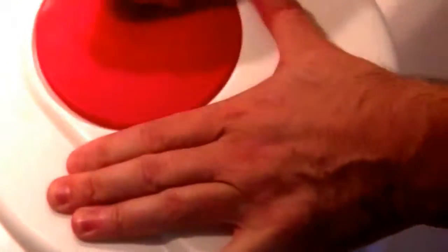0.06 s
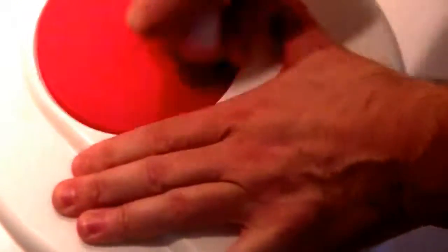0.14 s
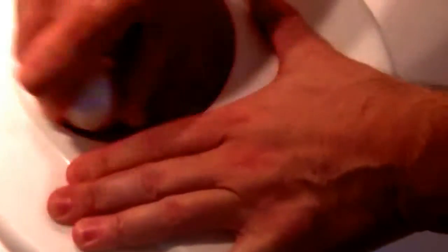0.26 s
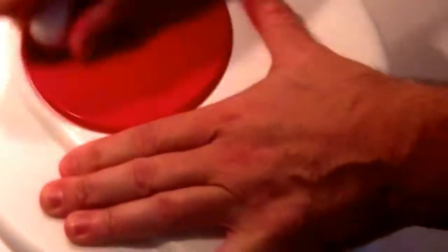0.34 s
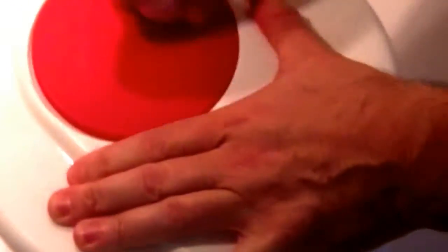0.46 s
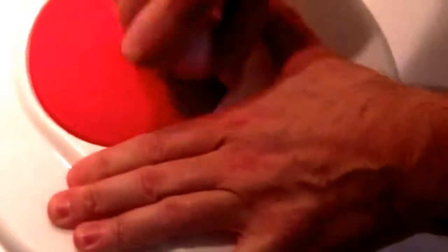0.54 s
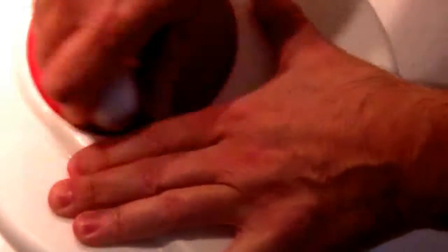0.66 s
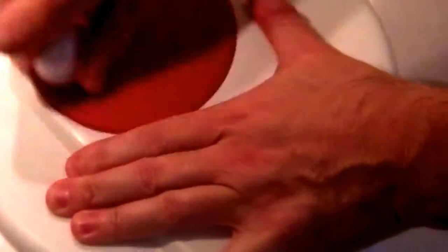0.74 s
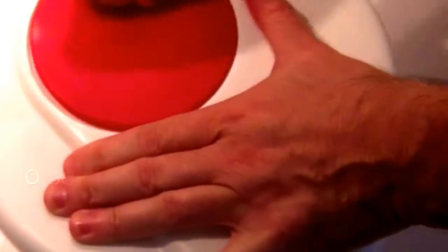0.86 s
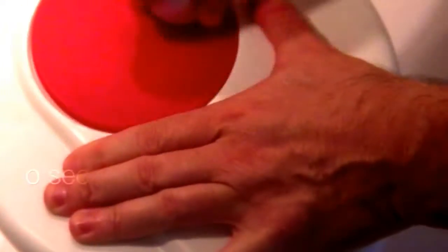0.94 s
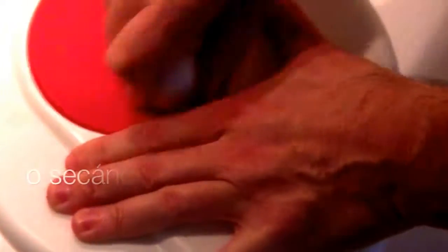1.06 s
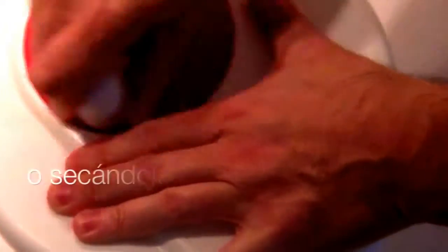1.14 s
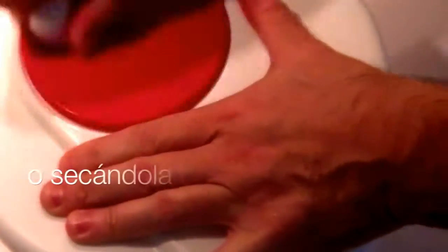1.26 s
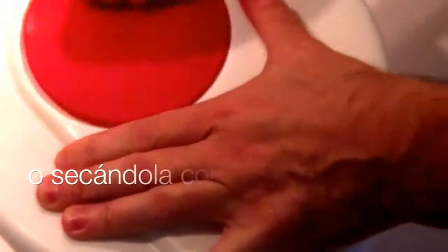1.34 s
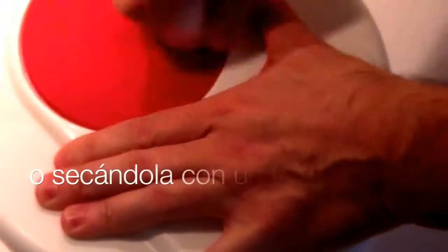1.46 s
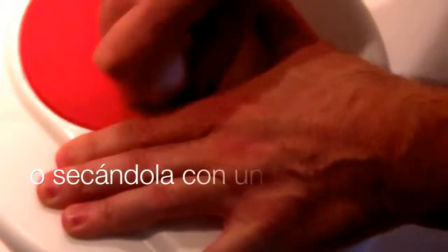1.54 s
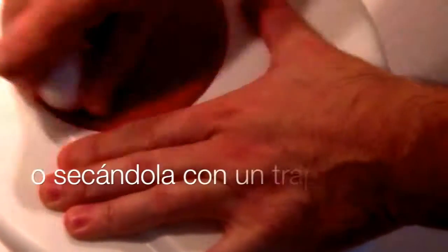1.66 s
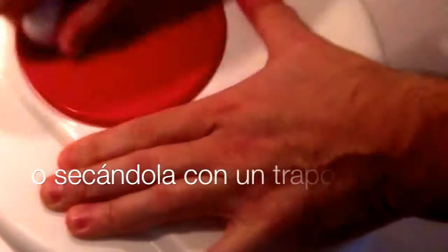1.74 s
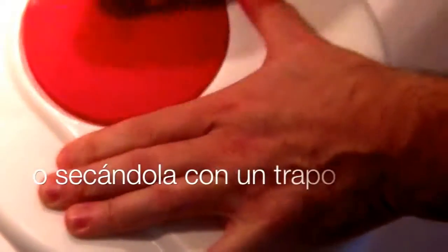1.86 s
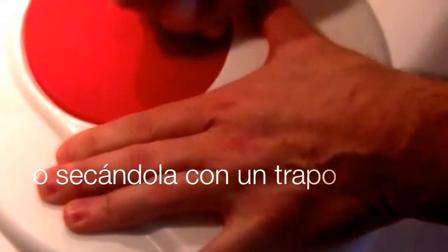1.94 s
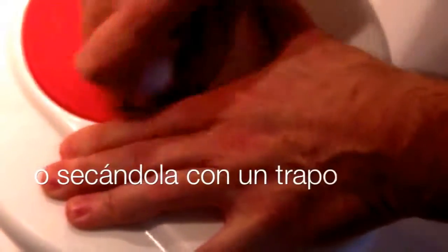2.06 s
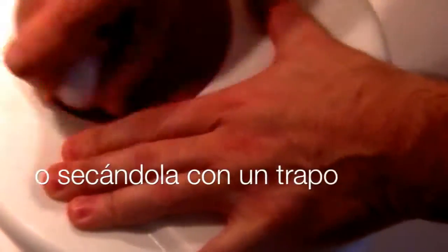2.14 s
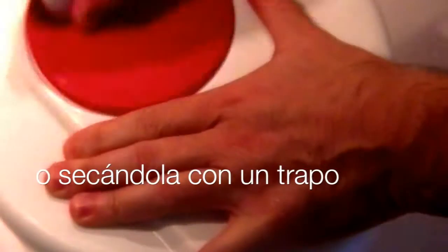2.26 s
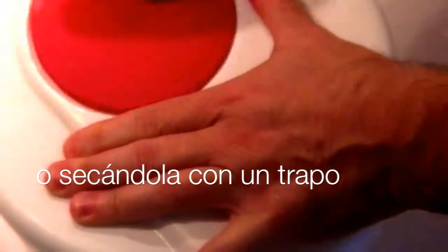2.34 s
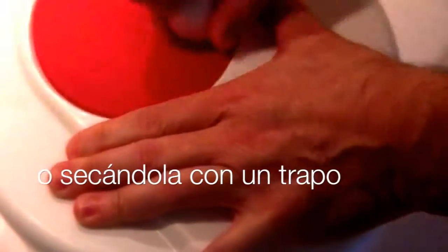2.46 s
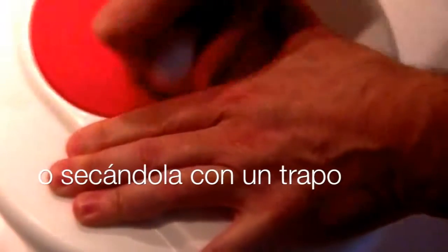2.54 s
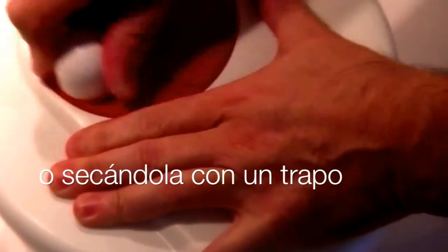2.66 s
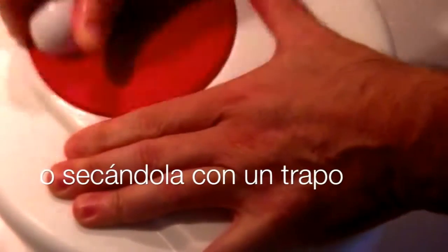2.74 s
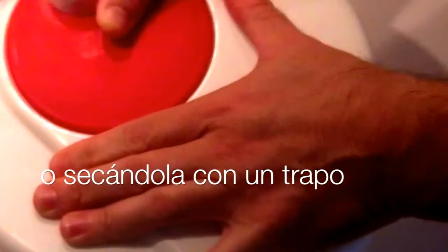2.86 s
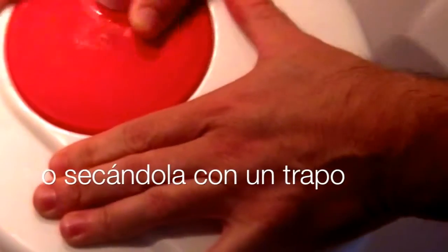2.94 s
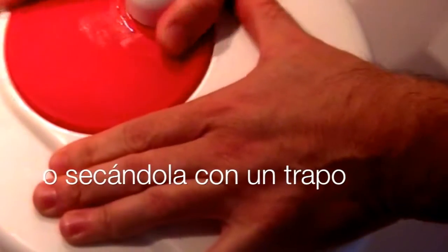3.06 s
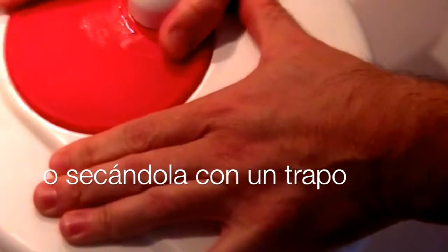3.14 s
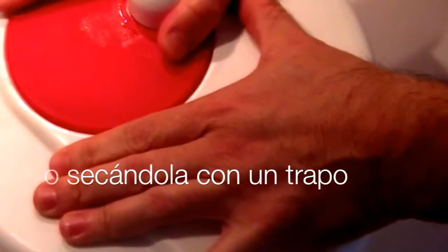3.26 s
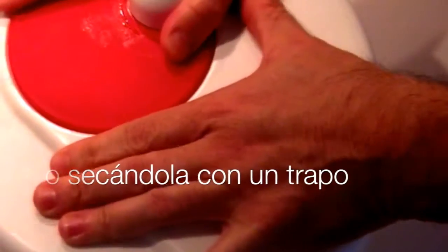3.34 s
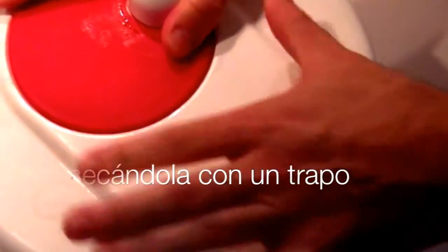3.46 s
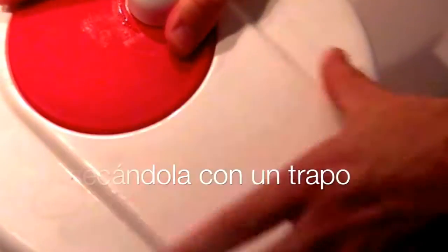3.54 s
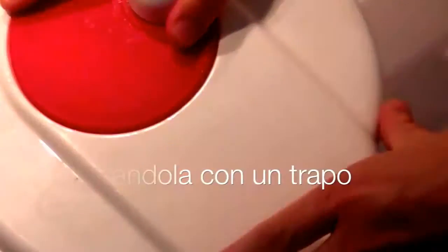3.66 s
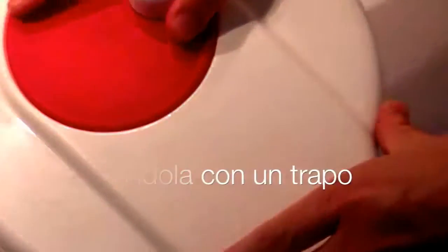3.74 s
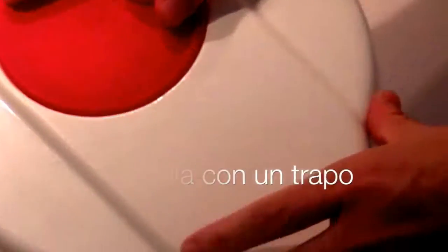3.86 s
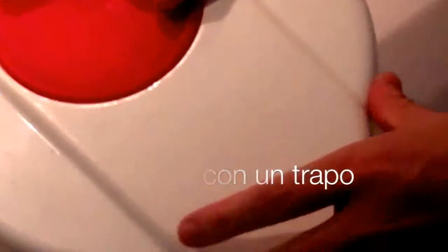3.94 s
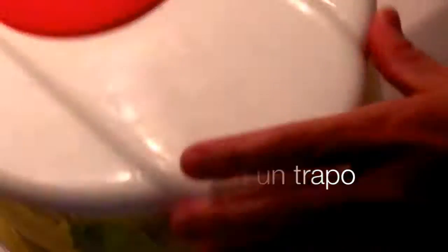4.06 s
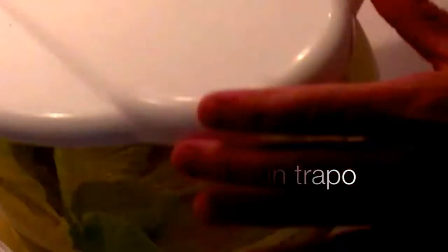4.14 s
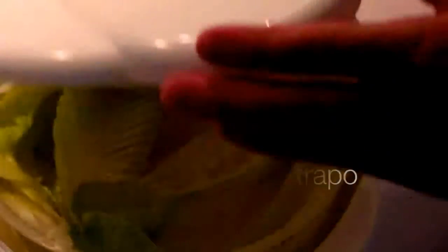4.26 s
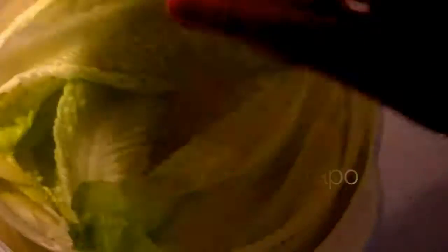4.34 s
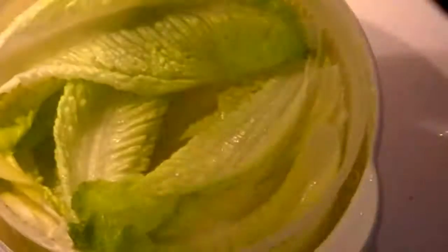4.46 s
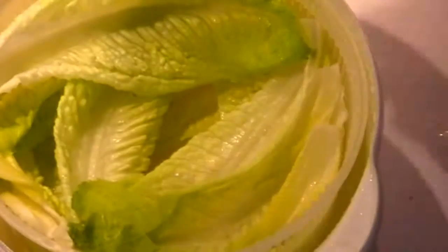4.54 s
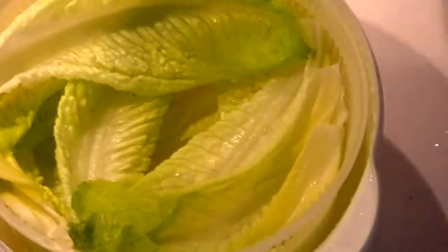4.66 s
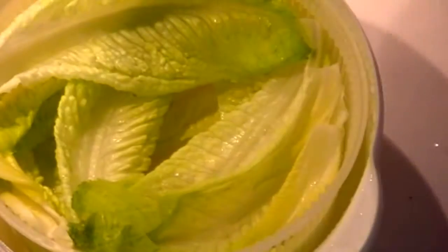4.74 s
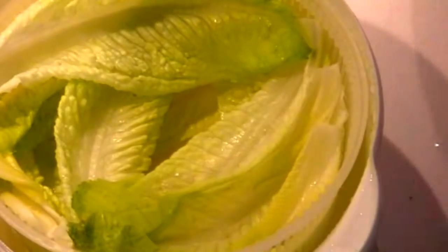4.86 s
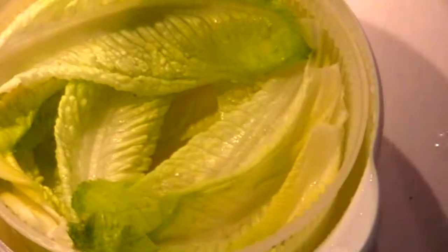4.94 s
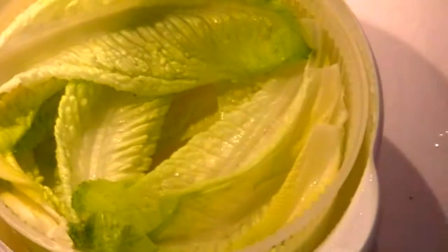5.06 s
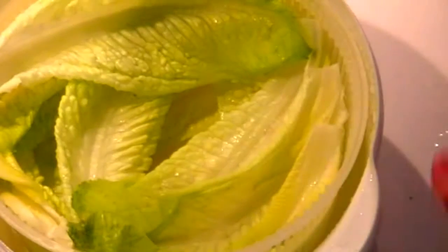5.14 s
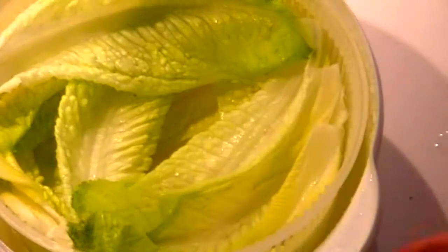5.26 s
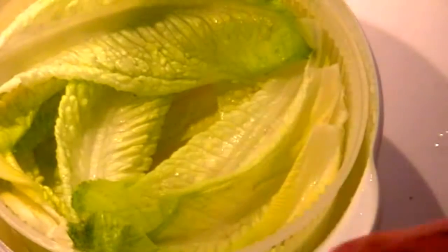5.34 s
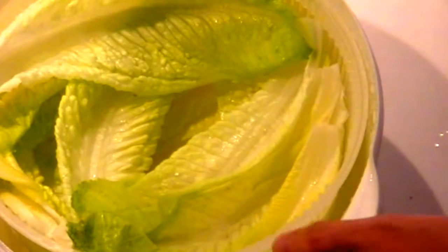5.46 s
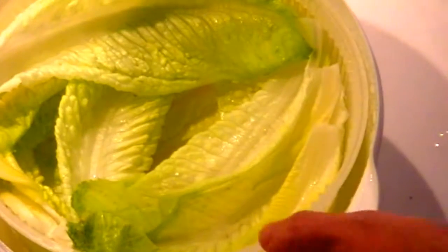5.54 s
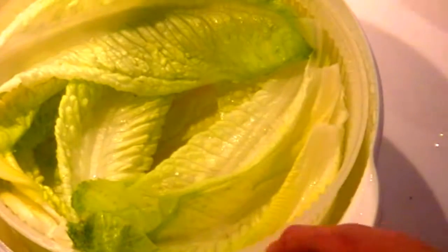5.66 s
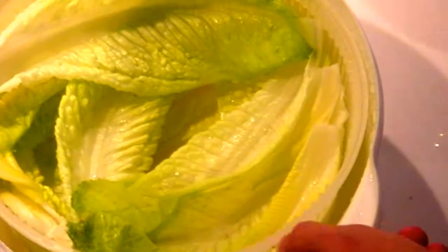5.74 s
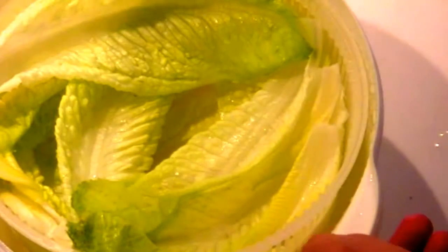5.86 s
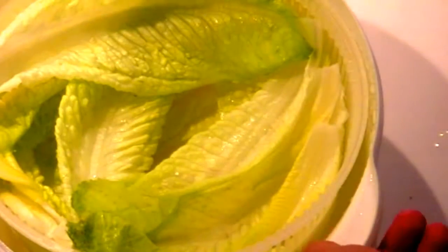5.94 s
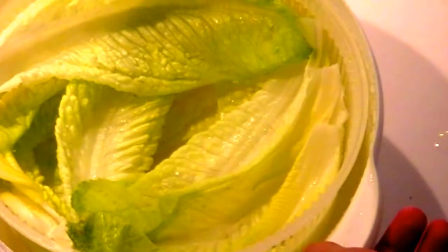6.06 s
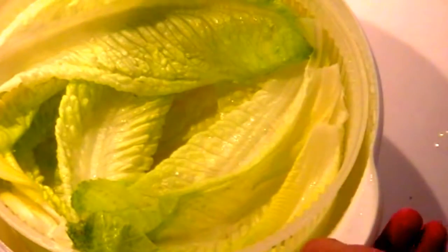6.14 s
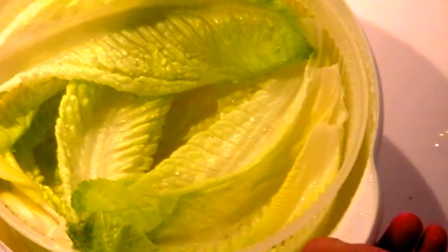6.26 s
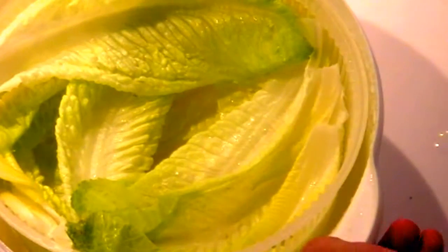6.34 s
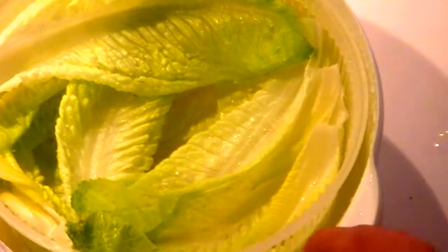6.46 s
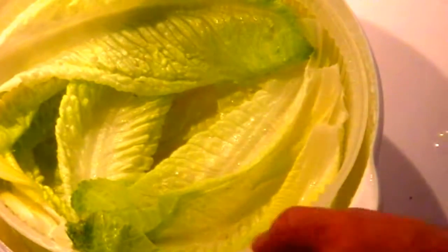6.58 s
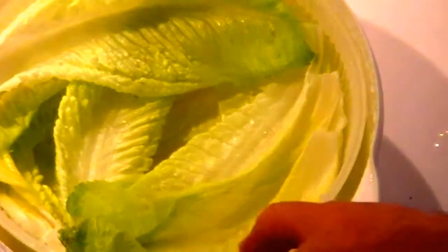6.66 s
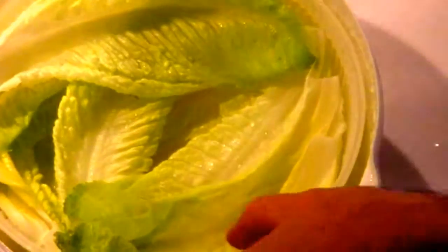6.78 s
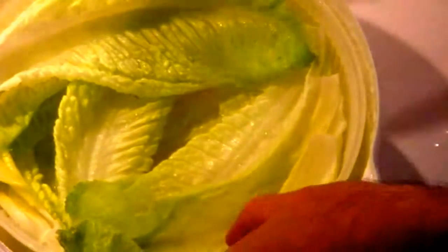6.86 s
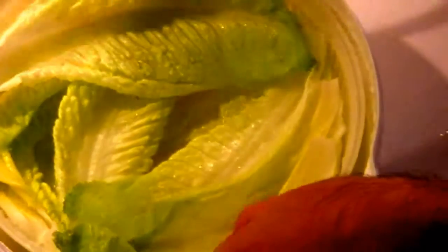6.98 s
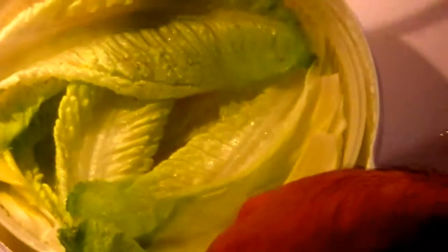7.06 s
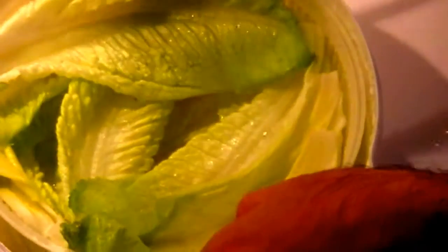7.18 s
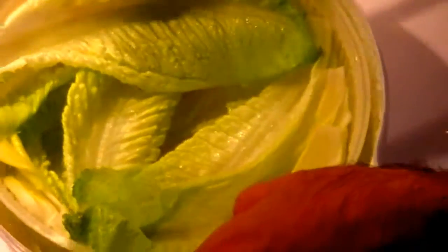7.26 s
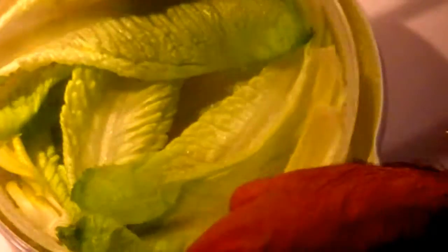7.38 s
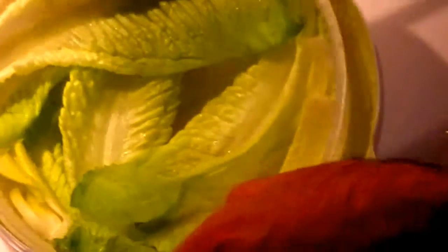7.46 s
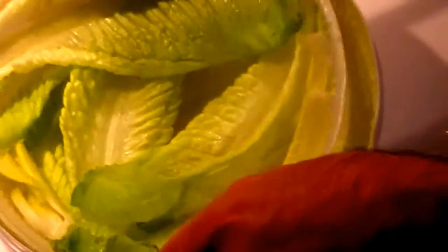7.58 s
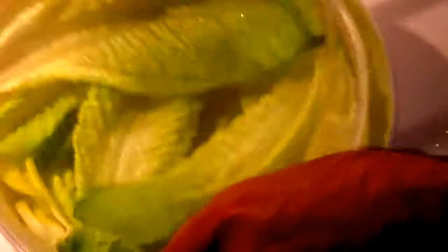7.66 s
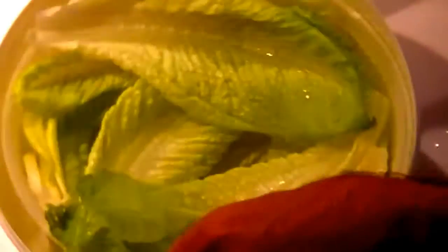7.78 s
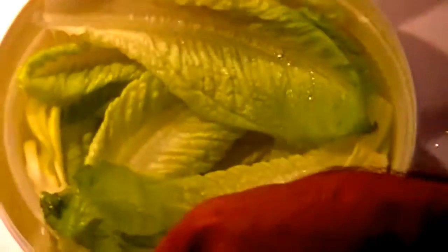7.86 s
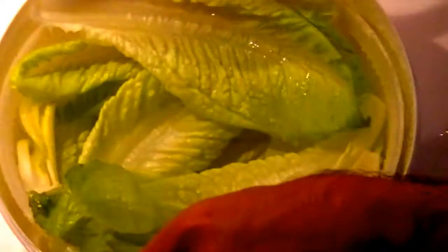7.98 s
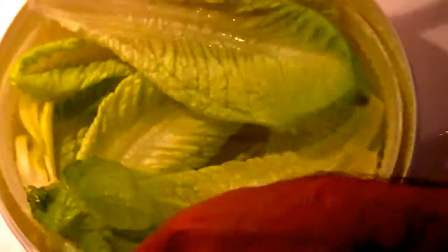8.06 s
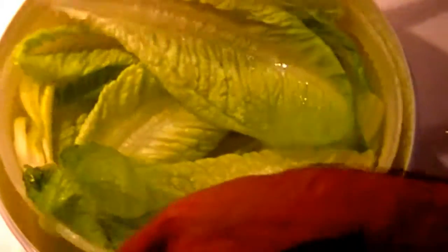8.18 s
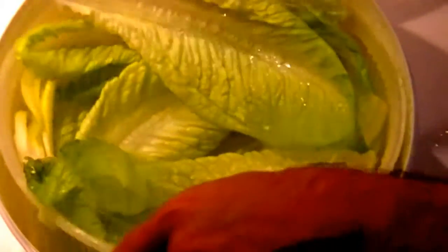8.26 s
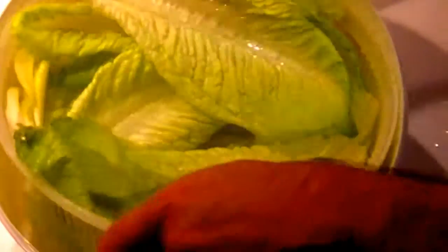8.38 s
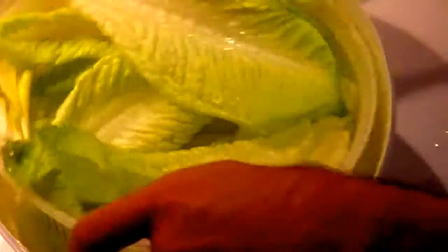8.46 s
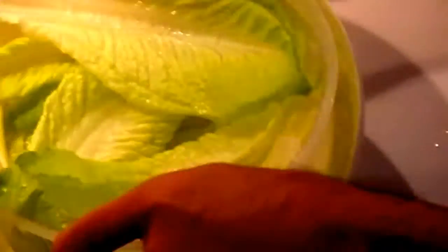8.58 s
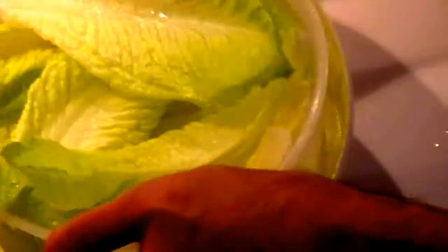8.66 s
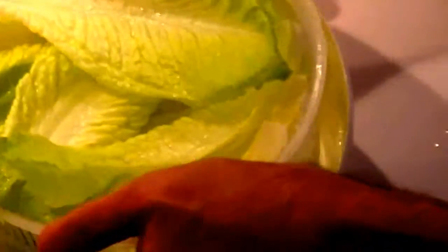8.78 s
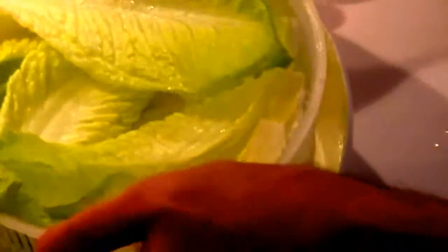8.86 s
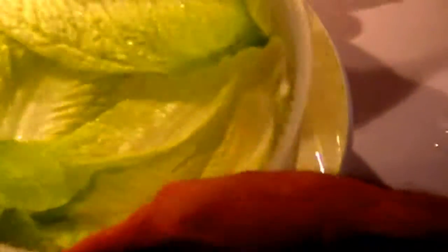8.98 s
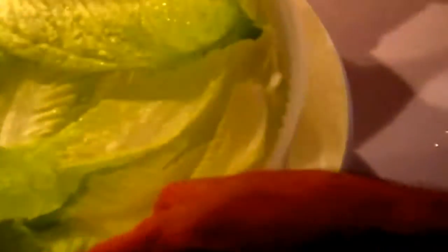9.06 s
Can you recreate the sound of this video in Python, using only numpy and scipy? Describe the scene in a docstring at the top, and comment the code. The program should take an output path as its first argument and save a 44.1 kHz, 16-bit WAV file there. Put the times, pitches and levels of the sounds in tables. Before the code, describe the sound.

Very close, a hand-cranked plastic salad spinner whirs with a buzzing gear rattle, low hum and hiss, pulsing with each push while the crank clacks and rasps. It slows and is braked abruptly. After a quiet gap with faint handling, the lid is lifted with light knocks, then set on the counter with loud hollow clatters. Wet leaves rustle and the bowl bumps softly, in a small hard kitchen over faint air.

```python
"""A plastic salad spinner is cranked on a kitchen counter, close to the ear, over a faint rush of air.
Periodic tooth impacts rattle the lid and hum; pressure makes the lid sing at each push of the crank.
The basket brushes the bowl once in each of its turns, and the crank clacks and rasps by stick and slip.
It is braked; the lid is lifted and put down with a clatter, each blow ringing the modes of a struck shell.
Leaves and hands slide as filtered noise while the basket of wet leaves is shifted in its bowl."""
import sys
import numpy as np
from scipy import signal
from scipy.fft import rfft, irfft
from scipy.io import wavfile
from scipy.ndimage import uniform_filter1d

SR = 44100
rng = np.random.default_rng(int(sys.argv[2]) if len(sys.argv) > 2 else 0)


def master_out(mix):
    """Clip the mix to full scale and print it as 16-bit PCM to the path in sys.argv[1]."""
    frames = np.transpose(np.atleast_2d(mix))
    ceiling = np.clip(frames, -1, 1)
    pcm = np.round(ceiling * 32767).astype(np.int16)
    wavfile.write(sys.argv[1], SR, pcm)


N = 401751
TIME = np.arange(N) / SR

# Levels in the tables are relative, ahead of the mix.
# Colour of still air in the kitchen. Each row: frequency in Hz, gain in dB.
AIR_COLOUR = [(25, -42), (80, -26), (150, -16.5), (240, -14), (305, -2.5), (370, -7), (520, -3),
              (615, -0.5), (720, -1.5), (920, 1), (1300, -6), (2500, -15), (5000, -23), (8000, -26),
              (15500, -45.5)]
# Stereo difference of the echoes and of the rush of air. Each row: frequency in Hz, gain in dB.
ECHO_SIDE = [(100, -9), (400, -18), (2000, -13), (4200, -14.5), (6500, -8.5), (8600, 1.5), (10500, 0.5),
             (13000, -8.5)]
AIR_SIDE = [(100, 5.5), (300, -1), (800, -8.5), (2000, -5), (6000, -5), (9000, -1.5), (14000, -2.5)]
AIR_DB = -56  # before its slow easing
ROOM_T60_S = 0.48
TOP_HZ = 15800

# Turns of the crank, each begun by a push.
# Each row: start in seconds, tooth rattle in dB, rubbing hiss in dB, hum in dB.
CRANK_TURNS = [(0.008, -29, -32.5, -35.5), (0.359, -31, -30.5, -39), (0.765, -31, -36.5, -36),
               (1.245, -33, -35, -36.5), (1.722, -33.5, -35.5, -35.5), (2.225, -33, -34.5, -36.5),
               (2.726, -35.5, -43.5, -36)]
LAST_TURN_S, STOP_S, HALT_S = 0.94, 3.036, 0.12  # the last turn is slow; then the basket is braked
BASKET_TURNS = 4  # per turn of the crank
PUSH_PEAK = 0.072  # share of a crank turn at which the hand presses hardest
RATTLE_PUSH_DB, HISS_PUSH_DB, HUM_PUSH_DB = 1.5, 2.5, -1.5  # swing with the hand's pressure
WOBBLE_PEAK = 0.039  # share of a basket turn at which the lopsided load bears hardest
RATTLE_WOBBLE_DB, HISS_WOBBLE_DB = 0.86, 1  # swing with that load

# Speed of the gears. Each row: time in seconds, teeth per second in Hz.
MESH_SPEED = [(0, 148.4), (0.24, 142.5), (0.4, 132), (0.56, 114.2), (0.8, 112), (1.25, 110), (1.6, 106.2),
              (2.0, 101.3), (2.28, 104.3), (2.57, 102.1), (2.9, 83.05), (3.1, 66.14)]
# Colours of tooth rattle and of rubbing. Each row: frequency in Hz, gain in dB.
RATTLE_COLOUR = [(70, -35.5), (105, -15), (160, -7.5), (215, -2), (300, -3.5), (380, -6.5), (460, -1.5),
                 (700, 0.5), (1050, -1), (1500, -7.5), (2100, -4.5), (2700, -13), (5000, -15),
                 (15000, -39.5)]
RUB_COLOUR = [(1000, -18), (2500, 0.5), (4000, 3.5), (6000, 1.5), (7700, 3), (9500, -6.5), (12000, -14),
              (15500, -36)]
# Resonances of the closed spinner. Each row: frequency in Hz, width in Hz, gain in dB.
SPINNER_MODES = [(230, 45, 4.5), (321, 30, 3.5), (425, 90, 4.5), (620, 35, 0.5), (730, 60, -8),
                 (875, 59, 4), (1013, 70, -14), (1200, 215, -5.5), (1467, 160, 6), (2140, 140, -6)]
# How well the bowl radiates the hum. Each row: frequency in Hz, gain in dB.
HUM_RADIATION = [(80, -30), (108, -18), (145, -1.5), (172, -7), (220, -2), (265, -1.5), (325, -7.5),
                 (375, -9), (440, -11), (600, -14)]
HUM_SLOW_DB, CRUISE_HZ = 19, 103  # hum lost per octave that the gears fall below cruising speed
TOOTH_SCATTER_DB, FIT_DB = 2.2, 1.4  # unevenness from tooth to tooth, and in short fits
BITE_SHARE = 0.45  # decay of a tooth's chatter, as a share of the tooth's time

# Swells of the hand's bearing on the lid.
# Each row: peak time in seconds, level in dB, half length to 1/e in seconds.
LID_SURGES = [(0.002, -11.5, 0.036), (0.063, -21.5, 0.0147), (0.143, -19, 0.019), (0.282, -22.5, 0.016),
              (0.36, -19.5, 0.036), (0.41, -21, 0.029), (0.505, -22, 0.02), (0.797, -20.5, 0.026),
              (0.876, -22, .02), (1.272, -15.5, 0.016), (1.337, -22, 0.025), (1.761, -16, 0.025),
              (1.829, -18.5, 0.02), (2.228, -22.5, 0.0093), (2.26, -17, 0.014), (2.334, -21, 0.015),
              (2.445, -24, 0.011), (2.613, -24.5, 0.019), (2.746, -28.5, 0.024), (2.806, -17, 0.013),
              (2.957, -22.5, 0.02), (3.047, -28, 0.018)]
LID_HZ = 880
SONG_DB, GROWL_DB, GROWL_WIDTH_HZ = -2.5, -5.5, 690  # wavering tone, and the rough band around it

# Colour of the basket brushing the bowl. Each row: frequency in Hz, gain in dB.
BRUSH_COLOUR = [(1000, -22.5), (3000, -3), (5500, -3.5), (7500, 0.5), (9500, -8), (11000, -9.5),
                (13000, -18), (16000, -25)]
BRUSH_DB, BRUSH_LEAD_S = -12.5, 0.012  # in mid-turn the bowl leans and the basket touches it earlier
# The basket catches on the bowl. Each row: time in seconds, level in dB, centre in Hz.
BASKET_SNAGS = [(0.0114, -12.5, 8050), (0.362, 1.5, 6950), (0.394, -11, 7500), (0.4387, -5.5, 6070),
                (2.826, -9, 5300), (2.853, -12, 4480), (2.968, -8.5, 4300), (3.045, -17, 4300)]
SNAG_DECAY_S = 0.0038

# The loose crank knocks in its bearing. Each row: time in seconds, peak in dB, pitch in Hz.
CRANK_CLACKS = [(0.188, -17, 1400), (0.498, -25, 1300), (0.977, -17, 1340), (1.33, -14, 1300),
                (1.454, -8.5, 1290), (1.947, -14, 1380), (2.045, -14, 1950), (2.444, -22, 1290),
                (2.593, -7, 1540), (2.767, -6.5, 1340), (2.789, -16, 1440), (2.855, -12, 1580),
                (3.026, -16, 1350), (3.046, -19, 1400)]
CLACK_WIDTH_HZ = 560
# The crank scrapes. Each row: start in seconds, level in dB, pitch in Hz, length in seconds.
CRANK_SCRAPES = [(0.209, -22.5, 1500, 0.051), (0.494, -29, 1230, 0.045), (0.802, -30.5, 1200, 0.06),
                 (0.967, -28.5, 1289, 0.033), (1.449, -25, 1170, 0.03), (1.939, -30, 1210, 0.054),
                 (2.44, -26, 1165, 0.024), (2.48, -31.5, 1107, 0.078), (2.783, -28, 1390, 0.05),
                 (2.85, -29.5, 1490, 0.086)]
SLIP_HZ, SLIP_SCATTER_DB = 330, 3.5  # median rate of the slips, and their unevenness

# Hands and leaves slide on plastic.
# Each row: peak time in seconds, decay to 1/e on either side in seconds, rustle in dB, rumble in dB.
HAND_SLIDES = [(3.42, 0.019, -53, -58), (3.717, 0.064, -53, -50.5), (3.816, 0.026, -49, -52),
               (4.55, 0.18, -57.5, -80), (4.85, 0.059, -48.5, -79.5), (5.088, 0.19, -58.5, -67),
               (6.853, 0.24, -47, -61), (7.123, 0.14, -47, -63), (7.716, 0.031, -37, -51),
               (7.83, .03, -49.5, -71.5), (8.084, 0.15, -56, -78), (8.357, 0.024, -45.5, -60),
               (8.555, 0.133, -49, -59), (8.88, 0.091, -53.5, -68)]
# Colour of wet leaves. Each row: frequency in Hz, gain in dB.
LEAF_COLOUR = [(500, -4.5), (1000, 7.5), (1700, 10.5), (2500, 4.5), (3500, 3), (5500, -1.5), (8000, -0.5),
               (10500, -9.5), (15000, -21)]
# Small ticks of plastic and wet leaves. Each row: time in seconds, level in dB, centre in Hz.
LEAF_TICKS = [(3.6116, -38.5, 6500), (3.7735, -28, 2400), (4.256, -34.5, 4090), (5.1664, -37.5, 6130),
              (7.668, -32, 6580), (8.1693, -40, 3000), (8.304, -30, 1970), (8.3458, -38, 7200),
              (8.684, -29.5, 7550), (8.79, -40, 2400), (8.855, -40, 7300), (8.9, -35, 2450),
              (8.968, -39, 2510)]

# Blows on the plastic. Each row: time in seconds, part, note of the struck spot in Hz, level in dB,
# brightness in dB, contact decay in seconds, second note in Hz, its level against the first in dB.
BLOWS = [(3.721, "bowl", 235, -54.5, 2, .012, 189, -16),
         (3.918, "bowl", 1382, -50.5, 8.5, 0.0017, 2250, -11),
         (4.087, "lid", 870, -41, -15, 0.00077, 1420, -1.5),
         (4.391, "lid", 1676, -37, -14.5, 0.0017, 2040, -7),
         (4.724, "lid", 873, -41, 1.5, 0.0026, 4280, -27), (4.815, "lid", 980, -47, 1, 0.0054, 1490, -6),
         (4.824, "lid", 1720, -44, 2, 0.01, 955, -0.5), (4.841, "lid", 1070, -49, 3.5, .006, 1630, -11),
         (4.85, "lid", 1060, -43, -8, 0.0032, 604, -0.5), (4.857, "lid", 760, -43, 0, .007, 1580, -7),
         (5.681, "lid on counter", 975, -36, -9.5, 0.0034, 1200, -5.5),
         (6.2789, "lid on counter", 1774, -23, -5.5, 0.0069, 2870, -14),
         (6.4567, "lid on counter", 1230, -24.5, 1, 0.0043, 2470, -8.5),
         (6.662, "lid on counter", 1009, -31, 3, 0.0028, 3010, -2.5),
         (6.791, "lid on counter", 1220, -33, 1, 0.0064, 2780, -2.5),
         (6.818, "lid on counter", 780, -37, -2, 0.0048, 2860, -4),
         (6.942, "lid on counter", 2860, -37, 2.5, 0.0031, 2030, -8),
         (6.992, "lid on counter", 1260, -38, 2.5, 0.003, 2050, -6),
         (7.012, "lid on counter", 870, -37.5, -0.5, 0.021, 2060, -9),
         (7.111, "lid on counter", 2050, -45, -1, 0.0011, 2970, -8),
         (7.172, "lid on counter", 1420, -49.5, -2, .002, 2600, -3),
         (7.37, "bowl", 700, -58, -12, .02, 484, -5), (7.474, "bowl", 1080, -53, 10, 0.0026, 2150, 4.5),
         (7.509, "bowl", 1100, -56.5, 13, .002, 2450, 0), (7.7, "bowl", 1650, -50, 16, 0.0079, 7420, -1.5),
         (7.72, "bowl", 838, -33.5, -19, 0.0035, 1560, -8.5), (7.732, "bowl", 475, -46, -8, 0.004, 860, -3),
         (7.816, "bowl", 2420, -58, 5, .004, 3170, 1), (8.045, "bowl", 2120, -57.5, -2, 0.0019, 2760, -10),
         (8.362, "bowl", 464, -52, -13, 0.0071, 1570, -1),
         (8.519, "bowl", 1436, -58, 0.5, .002, 2900, -8.5), (8.54, "bowl", 1148, -49, 9, .003, 440, -8)]
# Sound of each struck part. Each row: thud in dB, snap in dB, tick in dB, against its middle registers.
PART_BALANCE = {"bowl": (-7, -6.5, -22), "lid": (-22.5, -13, -9), "lid on counter": (-18.5, -2, -8)}
# Edges in Hz of the thud, body, clack, snap and tick registers.
REGISTERS_HZ = [150, 600, 1150, 2300, 4700, 18000]
# Modes of lid and bowl. Each row: frequency in Hz, width in Hz, gain in dB.
LID_MODES = [(287, 150, 5), (463, 91, 0), (717, 170, 1), (873, 95, 11), (1070, 84, 7), (1290, 200, 0.5),
             (1650, 480, 6), (2050, 450, 0.5), (2960, 370, 3.5), (3720, 590, -2), (5330, 650, -5),
             (6960, 1500, -5)]
BOWL_MODES = [(305, 50, 9.5), (463, 80, 7.5), (860, 90, 11), (1060, 88, -12), (1560, 200, 9),
              (2150, 250, -4), (2930, 540, 0)]
# Colour of struck plastic. Each row: frequency in Hz, gain in dB.
PLASTIC_COLOUR = [(80, -27), (150, -31), (220, -6), (300, -4.5), (400, -5), (620, -1.5), (900, -0.5),
                  (1400, 0), (2800, -1.5), (4500, -7.5), (6000, -7), (7800, -7.5), (10000, -11.5),
                  (15500, -16)]
# A high note favours the clack, a low one the body.
LEAN_DB_PER_OCTAVE, LEAN_HZ, LEAN_MAX_DB = 27, 1050, 13.5
NOTE_DB = 4.5  # note of the struck spot over the rest of its register
SECOND_WIDTH = 0.11  # width of the second note as a share of its pitch


def undb(db):
    """Amplitude gain is the exponential of a level in decibels."""
    return 10 ** (np.asarray(db) / 20)


def unit(x):
    """Normalising mean power sets the rms to 1."""
    return x / np.sqrt(np.mean(x ** 2))


def curves(table):
    """Linear interpolation in time joins the rows of each column."""
    s, *columns = np.transpose(table)
    return [np.interp(TIME, s, c) for c in columns]


def add(track, s, sound):
    """Superposition: a sound adds to a track at time s."""
    start = max(int(s * SR), 0)
    track[start:start + len(sound)] += sound[:N - start]


def band(x, lo_hz, hi_hz):
    """A causal band-pass keeps one range of frequencies."""
    edges_hz = [lo_hz, min(hi_hz, 0.48 * SR)]
    return signal.sosfilt(signal.butter(4, edges_hz, "band", fs=SR, output="sos"), x)


def resonate(x, hz, width_hz):
    """A damped oscillator responds with gain 1 at its centre."""
    return signal.lfilter(*signal.iirpeak(hz, hz / width_hz, fs=SR), x + 1e-18)


def colour(x, points, size=4096):
    """A minimum-phase filter, by folding the cepstrum, follows (Hz, dB) points causally."""
    hz, db = np.transpose(points)
    log_hz = np.log(np.fft.rfftfreq(size, 1 / SR) + 1)
    gain = undb(np.interp(log_hz, np.log(hz), db))
    cepstrum = irfft(np.log(gain))[:size // 2]
    cepstrum[1:] *= 2
    response = irfft(np.exp(rfft(cepstrum, size)))[:size // 2]
    return signal.fftconvolve(x, response)[:len(x)]


def walk(rate):
    """Held random values, smoothed, give slow fluctuation of rms 1."""
    k = int(SR / rate)
    steps = np.repeat(rng.standard_normal(N // k + 1), k)
    return unit(uniform_filter1d(steps, k)[:N])


def grains(rate, spread_db):
    """A Poisson-like train of tiny impacts has random times and uneven sizes."""
    hits = rng.random(N) < rate / SR
    return hits * rng.standard_normal(N) * undb(spread_db * rng.standard_normal(N))


def contact(decay_s, rise_s=0.00047, size=4096):
    """Chatter is noise of random sign that builds up quickly and dies away exponentially."""
    t = TIME[:size]
    envelope = (1 - np.exp(-t / rise_s)) * np.exp(-t / max(decay_s, 1e-4))
    return rng.choice([-1., 1.], size) * envelope


def shell(x, modes, plain_db):
    """Modal superposition: broad resonances of thin plastic walls add to the plain force."""
    return undb(plain_db) * x + sum(undb(db) * resonate(x, hz, width) for hz, width, db in modes)


def tick(hz, decay_s):
    """A tiny contact excites a band around its centre, with a faint broad click."""
    touch = contact(decay_s)
    ring = resonate(resonate(touch, hz, 0.5 * hz), hz, 0.5 * hz)
    return ring + undb(-16) * band(touch, 300, 6000)


def stereo(mid, side, side_colour):
    """Sum and difference of a shared part and a coloured side give left and right."""
    side = colour(side, side_colour)
    return np.array([mid + side, mid - side])


def room_tone():
    """Stationary coloured noise makes a faint rush of air, which on the whole eases off."""
    mid, side = (unit(colour(rng.standard_normal(N), AIR_COLOUR)) for _ in range(2))
    ease_db = np.interp(TIME, [3.4, 4.5, 5.5, 7.5, 9], [6.0, 5.5, 2.5, 3.5, -0.5])
    return stereo(mid, side, AIR_SIDE) * undb(AIR_DB + ease_db + 0.24 * walk(3.24))


def kitchen(x):
    """Convolution with decaying noise gives quick reflections, then a small hard room's tail."""
    t = TIME[:SR * 3 // 4]
    early = (t > 0.001) * np.exp(-t / 0.011)
    late = (1 - np.exp(-t / 0.0057)) * np.exp(-np.log(1000) * t / ROOM_T60_S)
    tail_colour = [(150, -8.5), (500, 1.0), (1200, 1.5), (3000, -3.5), (7500, -2.5), (15000, -14.0)]
    echoes = []
    for _ in range(2):
        near = unit(early * rng.standard_normal(len(t))) * undb(-10)
        far = colour(unit(late * rng.standard_normal(len(t))), tail_colour)
        echoes.append(signal.fftconvolve(x, (near + far) / np.sqrt(len(t)))[:N])
    return stereo(*echoes, ECHO_SIDE)


def crank_turns():
    """Kinematics of the crank: start and length of each turn in seconds."""
    starts = np.array(CRANK_TURNS)[:, 0]
    return starts, np.append(np.diff(starts), LAST_TURN_S)


def drive():
    """Periodic forcing: hand pressure and a lopsided load modulate rattle, hiss and hum levels."""
    starts, lengths = crank_turns()
    turn = sum(np.clip((TIME - s) / length, 0, 1) for s, length in zip(starts, lengths))
    levels = np.array(CRANK_TURNS)[:, 1:4]
    rattle_db, hiss_db, hum_db = curves(np.column_stack([starts + 0.39 * lengths, levels]))
    press = np.cos(2 * np.pi * (turn - PUSH_PEAK))
    wobble = np.cos(2 * np.pi * (BASKET_TURNS * turn - WOBBLE_PEAK))
    rattle_db = rattle_db + RATTLE_PUSH_DB * press + RATTLE_WOBBLE_DB * wobble
    hiss_db = hiss_db + HISS_PUSH_DB * press + HISS_WOBBLE_DB * wobble
    return rattle_db, hiss_db, hum_db + HUM_PUSH_DB * press


def gears():
    """Periodic impacts of uneven teeth rattle the lid; their harmonics hum, and the bearing rubs."""
    mesh_hz, = curves(MESH_SPEED)
    rattle_db, hiss_db, hum_db = drive()
    hum_db = hum_db + HUM_SLOW_DB * np.minimum(np.log2(mesh_hz / CRUISE_HZ), 0)
    teeth = np.cumsum(mesh_hz * (1 + 0.02 * walk(45))) / SR
    tooth_force = undb(TOOTH_SCATTER_DB * rng.standard_normal(int(teeth[-1]) + 1))
    force = tooth_force[teeth.astype(int)]
    strikes = np.diff(np.floor(teeth + 0.1557 * walk(150)), prepend=0) * force
    bite = np.exp(-(teeth % 1) / BITE_SHARE) * force
    chatter = unit(strikes) * undb(-4.5) + unit(bite * grains(rate=4000, spread_db=1.4))
    rattle = unit(colour(shell(chatter, SPINNER_MODES, plain_db=2.5), RATTLE_COLOUR))
    rattle = rattle * undb(rattle_db + 3.5 + FIT_DB * walk(29.99))
    # each harmonic of the mesh swells as it passes a resonance of the bowl
    hum_hz, response_db = np.transpose(HUM_RADIATION)
    hum = np.zeros(N)
    for k in range(1, 5):
        harmonic_db = np.interp(k * mesh_hz, hum_hz, response_db) + 3 * walk(28)
        hum += undb(harmonic_db) * np.sin(2 * np.pi * k * teeth)
    rub = unit(grains(rate=6500, spread_db=0.0) * (1 + 0.3 * bite))
    hiss = unit(colour(rub, RUB_COLOUR)) * undb(hiss_db - 1.5)
    turning = np.interp(TIME, [STOP_S, STOP_S + HALT_S], [1, 0])
    # a small plastic bowl radiates hardly any bass
    return band(rattle + hum * undb(hum_db + 1) + hiss, 96, 20000) * turning


def surges():
    """Gaussian envelopes of pressure on the lid; the strongest at any moment prevails."""
    swells = []
    for s, db, half_s in LID_SURGES:
        swells.append(undb(db) * np.exp(-np.minimum(((TIME - s) / half_s) ** 2, 20)))
    return np.max(swells, axis=0)


def lid_song():
    """Driven oscillation: pressure makes the lid's main mode waver, throbbing near the tooth rate."""
    effort = surges()
    mesh_hz, = curves(MESH_SPEED)
    waver = 1 + 0.005 * walk(25) + 0.011 * walk(110) + 0.024 * walk(420)
    phase = 2 * np.pi * np.cumsum(LID_HZ * waver) / SR
    teeth = np.cumsum(mesh_hz * (1 + 0.1 * walk(60))) / SR
    rough_db = 1.5 * walk(200) + 2.5 * np.sin(2 * np.pi * teeth)
    noise = resonate(rng.standard_normal(N), LID_HZ, GROWL_WIDTH_HZ)
    growl = unit(resonate(noise, LID_HZ, GROWL_WIDTH_HZ))
    tone = np.sqrt(2) * np.sin(phase) * effort * undb(SONG_DB)
    # the growl builds and fades more slowly than the tone
    growl = growl * uniform_filter1d(effort, size=3000) * undb(GROWL_DB)
    return (tone + growl) * undb(rough_db)


def brushes():
    """Rubbing friction: the basket swishes once in each of its turns, and snags tick, until it slows."""
    starts, _ = crank_turns()
    track = np.zeros(N)
    for turn in np.arange(1, BASKET_TURNS * (len(starts) - 1) + 1) / BASKET_TURNS:
        s = np.interp(turn, np.arange(len(starts)), starts) - BRUSH_LEAD_S * np.sin(np.pi * turn) ** 2
        # the regular brushing sets in once the load has settled
        if turn >= 3 / 2:
            gain = undb(BRUSH_DB + 0.39 * rng.standard_normal())
            add(track, s, gain * contact(0.011, rise_s=0.0027))
    track = colour(track * (1 + 0.056 * walk(760)), BRUSH_COLOUR)
    for s, db, hz in BASKET_SNAGS:
        add(track, s, undb(db) * tick(hz, SNAG_DECAY_S))
    return track


def clacks():
    """Impulse response: each hard tap of the crank rings for a few cycles."""
    track = np.zeros(N)
    for s, db, hz in CRANK_CLACKS:
        blow = signal.unit_impulse(2048) + 0.05 * contact(0.003, size=2048)
        tap = resonate(resonate(blow, hz, CLACK_WIDTH_HZ), hz, hz)
        add(track, s, undb(db) * tap / np.abs(tap).max())
    return track


def slips(size):
    """Stick and slip: friction releases a train of uneven jerks."""
    drift = np.repeat(rng.standard_normal(size // 128 + 1), 128)[:size]
    cycles = np.cumsum(SLIP_HZ * np.exp(0.5 * drift)) / SR
    jerks = np.diff(np.floor(cycles), prepend=-1) * undb(SLIP_SCATTER_DB * rng.standard_normal(size))
    return jerks * rng.choice([-1., 1.], size)


def scrapes():
    """Stick-slip excitation of a resonance: the crank disc rasps coarsely and briefly on the lid."""
    track = np.zeros(N)
    for s, db, hz, length_s in CRANK_SCRAPES:
        swell = signal.windows.tukey(int(length_s * SR), 0.4)
        jerks = unit(slips(len(swell))) + undb(-7) * rng.standard_normal(len(swell))
        rasp = resonate(resonate(jerks, hz, 760), hz, 1200)
        add(track, s, undb(db) * unit(rasp * swell))
    return track


def handling():
    """Friction noise: leaves crackle, fingers slide, and the bowl rumbles softly as it is moved."""
    rustling, rumbling = np.zeros(N), np.zeros(N)
    for s, decay_s, rustle_db, rumble_db in HAND_SLIDES:
        swell = np.exp(-np.abs(TIME - s) / decay_s)
        rustling = np.maximum(rustling, undb(rustle_db) * swell)
        rumbling = np.maximum(rumbling, undb(rumble_db) * swell)
    crackle = grains(rate=1800, spread_db=2.5)
    rustle = unit(colour(crackle, LEAF_COLOUR)) * rustling
    rumble = unit(band(rng.standard_normal(N), 179, 414.0)) * rumbling
    ticks = np.zeros(N)
    for s, db, hz in LEAF_TICKS:
        add(ticks, s, undb(db) * tick(hz, 0.0053))
    return rustle + rumble + ticks


def registers(part, hz, db, bright_db):
    """Spectral balance: levels of thud, body, clack, snap and tick lean towards a blow's note."""
    thud_db, snap_db, tick_db = PART_BALANCE[part]
    lean_db = np.clip(LEAN_DB_PER_OCTAVE * np.log2(hz / LEAN_HZ), -LEAN_MAX_DB, LEAN_MAX_DB)
    deep_db = np.clip(LEAN_DB_PER_OCTAVE * np.log2(REGISTERS_HZ[1] / hz), 0, LEAN_MAX_DB)
    body_db, clack_db = min(-lean_db, 0), min(lean_db, 0)
    return db + np.array([thud_db + deep_db, body_db, clack_db,
                          snap_db + bright_db / 2, tick_db + bright_db])


def knocks(struck_part):
    """Modal excitation: each blow rings the shell, most of all at two notes of the struck spot."""
    modes = BOWL_MODES if struck_part == "bowl" else LID_MODES
    track = np.zeros(N)
    for s, part, hz, level_db, bright_db, contact_s, second_hz, second_db in BLOWS:
        if part != struck_part:
            continue
        levels_db = registers(part, hz, level_db, bright_db)
        # the loose parts buzz on faintly after the blow
        push = contact(contact_s, rise_s=0.001)
        buzz_swing = undb(5 * np.repeat(rng.standard_normal(64), 64))
        push = push + undb(-19) * contact(0.018, rise_s=0.004) * buzz_swing
        # harder blows reach further into the treble
        top_hz = np.interp(max(levels_db), [-38, -24], [8500, 14000])
        wall = unit(band(colour(shell(push, modes, plain_db=0), PLASTIC_COLOUR), 55, top_hz))
        impulse = signal.unit_impulse(len(push))
        note = resonate(impulse + 0.035 * push, hz, 65 + 0.03 * hz)
        for lo_hz, hi_hz, db in zip(REGISTERS_HZ, REGISTERS_HZ[1:], levels_db):
            ringing = unit(band(wall, lo_hz, hi_hz))
            if lo_hz <= hz < hi_hz:
                ringing = ringing + undb(NOTE_DB) * unit(band(note, lo_hz, hi_hz))
            add(track, s, undb(db - 1.5) * unit(ringing))
        second = resonate(impulse + 0.03 * push, second_hz, SECOND_WIDTH * second_hz)
        second = unit(band(second, 0.68 * second_hz, 1.42 * second_hz))
        add(track, s, undb(level_db + second_db) * second)
    return track


def scene():
    """Direct and reverberant sound: the lid is nearest, spinning or lifted, so it excites less room."""
    spinning = gears() + brushes() + scrapes() + clacks()
    song = lid_song()
    lifting = knocks("lid") * undb(0.5)
    unpacking = knocks("lid on counter") + knocks("bowl") + handling()
    echoes = kitchen(undb(-3.5) * spinning + undb(-8.0) * song + undb(-3.0) * lifting + unpacking)
    return spinning * undb(-2.0) + song + lifting + unpacking + echoes + room_tone()


def record(dry):
    """Saturation rounds the highest peaks, and a steep low-pass cuts the top."""
    low_pass = signal.ellip(8, 0.2, 70, TOP_HZ, fs=SR, output="sos")
    return signal.sosfilt(low_pass, np.tanh(dry))


dry = scene()
out = record(dry)
master_out(out)
```